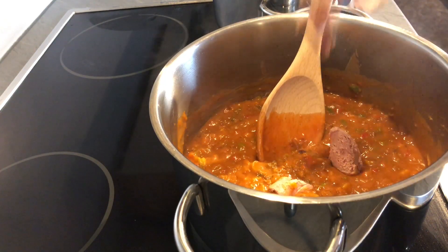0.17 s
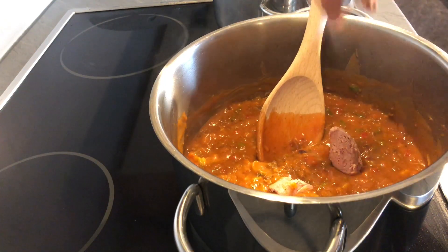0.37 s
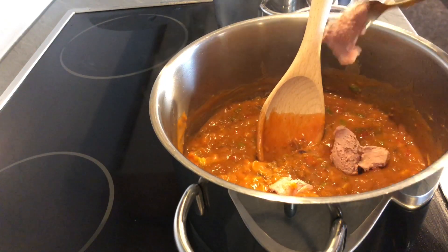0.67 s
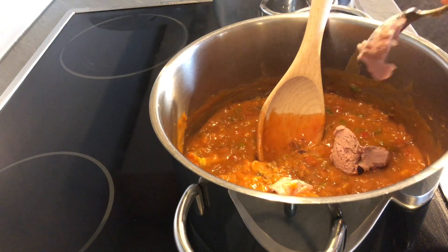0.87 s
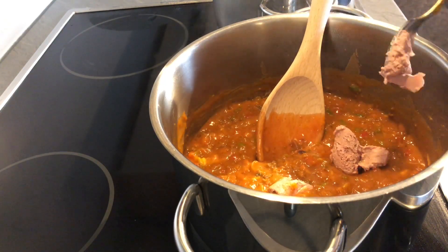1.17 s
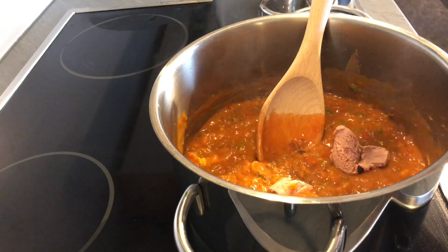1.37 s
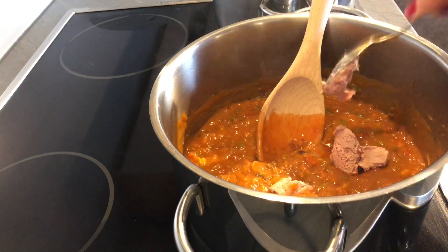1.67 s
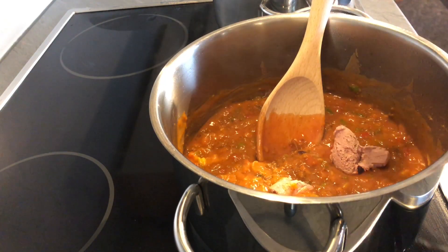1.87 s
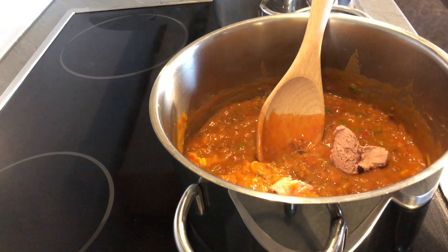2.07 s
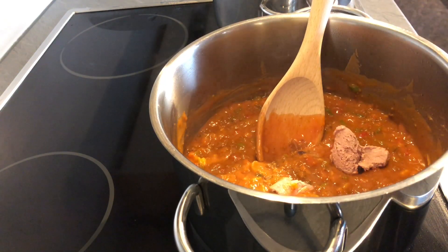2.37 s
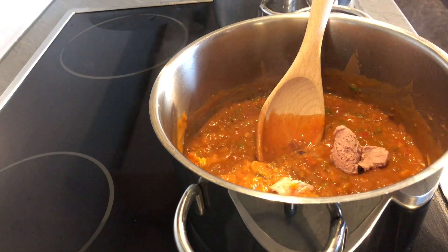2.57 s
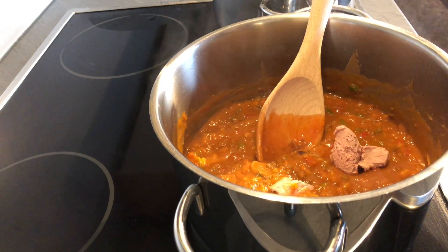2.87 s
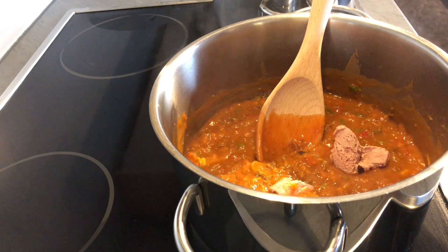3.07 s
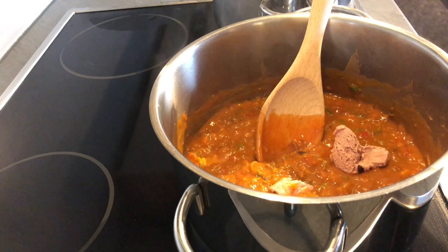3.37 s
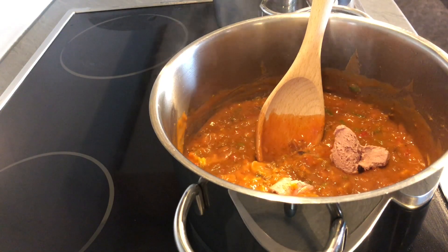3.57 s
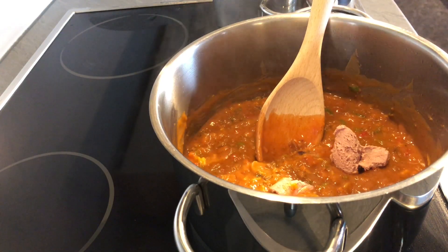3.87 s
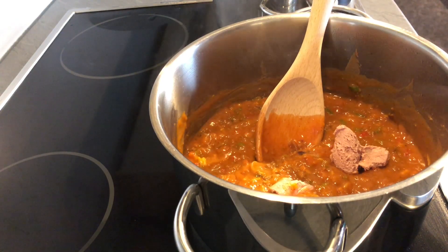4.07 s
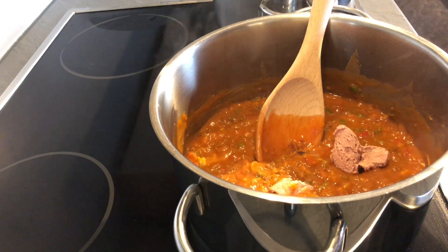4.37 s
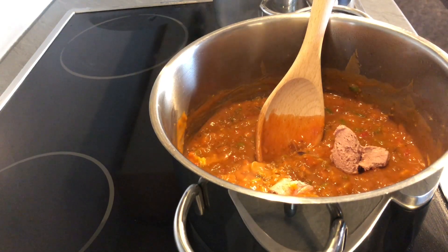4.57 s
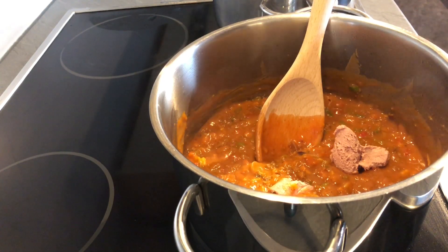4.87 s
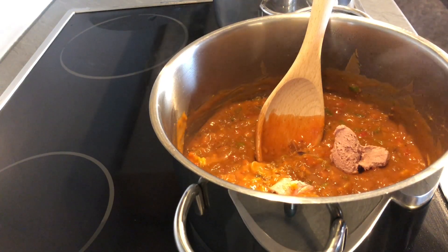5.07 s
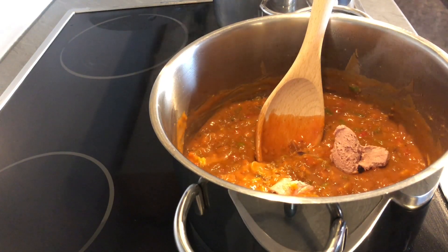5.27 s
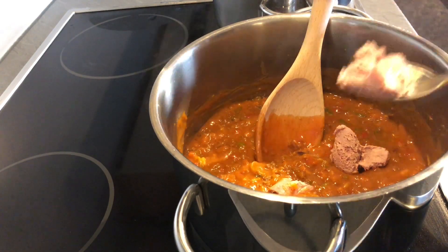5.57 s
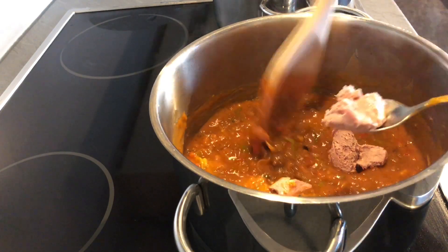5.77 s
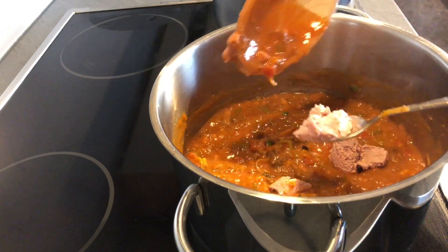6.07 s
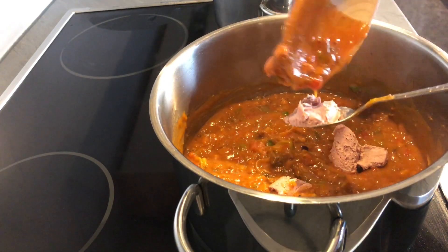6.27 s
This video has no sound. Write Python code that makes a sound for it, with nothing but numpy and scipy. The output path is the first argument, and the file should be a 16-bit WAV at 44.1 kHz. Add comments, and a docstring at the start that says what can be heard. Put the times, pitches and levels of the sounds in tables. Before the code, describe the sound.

In a kitchen, a wooden spoon knocks lightly on a pot, with faint wet smacks of sauce. A metal spoon clinks sharply against a dish several times. A cupboard door squeaks faintly, then slams with a harsh, distorted crack, and its contents rattle while a tray rings. A few soft knocks follow. The nearby microphone sounds slightly dull, with faint rumble and hiss fading in and out.

```python
"""Impacts and friction in a kitchen

Struck bodies ring in damped modes: a spoon clinks in a dish, wood knocks on counter and pot. Sauce smacks
and things slide. A cupboard door squeaks, slams and rattles, and a tray inside sings. Background rumble
and hiss rise and fall as the recorder's noise suppressor opens and closes. The loudest blow overflows
the number range and wraps round into a harsh crack."""
import sys
import numpy as np
from scipy import signal
from scipy.fft import rfft, irfft, next_fast_len
from scipy.io import wavfile
from scipy.ndimage import uniform_filter1d, minimum_filter1d, map_coordinates

SR = 44100
rng = np.random.default_rng(int(sys.argv[2]) if len(sys.argv) > 2 else 0)


def waveform_to_disk(signal):
    """Save audio, clipped to [-1, 1], as 16-bit WAV at the path in sys.argv[1]."""
    frames = np.transpose(np.atleast_2d(signal))
    scaled = np.clip(frames, -1, 1) * 32767
    samples = np.round(scaled).astype(np.int16)
    wavfile.write(sys.argv[1], SR, samples)


N = 283563

# background let through by the noise suppressor: t/s, rumble level/dB, hiss level/dB
SUPPRESSOR_LEVELS = [(0.0, -56, -61), (0.14, -51.5, -62), (0.27, -52, -59.5), (0.5, -71.5, -78),
                     (0.76, -67, -76), (0.87, -56, -61.5), (1.03, -55.5, -63.5), (1.2, -54.5, -63),
                     (1.49, -69, -77.5), (1.73, -68, -81.5), (1.9, -59.5, -66.5), (2.15, -52.5, -60.5),
                     (2.45, -65, -67), (2.66, -67.5, -77), (2.88, -59.5, -67.5), (3.14, -50.5, -57.5),
                     (3.3, -55.5, -58), (3.59, -65, -75), (3.74, -61.5, -65.5), (3.84, -56.5, -56.5),
                     (4.05, -49.5, -52), (4.46, -48, -57.5), (5.07, -52, -46.5), (5.18, -54, -52),
                     (5.36, -69.5, -77), (5.62, -75.5, -76.5), (5.78, -60, -70.5), (5.94, -64, -68),
                     (6.15, -53.5, -60.5), (6.29, -56, -67.5), (6.43, -71.5, -74)]
# spectra of the rumble and of the hiss before its tilt: f/Hz, relative density/dB
RUMBLE_SPECTRUM = [(12, -64.5), (20, -37), (43, -6.5), (173, -7), (206, -11), (242, -4.5), (289, -23.5),
                   (323, -16.5), (400, -33), (520, -57), (880, -120)]
HISS_SPECTRUM = [(180, -24), (300, -8.5), (523, -3), (1070, -8), (1200, -8), (1720, -12), (2840, -14),
                 (5490, -25), (7060, -32.5), (9180, -72), (15500, -120)]
# reverberation time of the kitchen: f/Hz, T60/s
REVERBERATION = [(150, 0.43), (1000, 0.12), (3000, 0.28), (7000, 0.39)]
# smacks of sauce: t/s, level/dB, centre f/Hz, duration/s
SAUCE_SMACKS = [(0.361, -68.5, 3400, 0.067), (0.546, -74, 3500, 0.013), (0.855, -63, 3340, 0.053),
                (0.925, -56, 2880, 0.0043), (1.166, -63.5, 3000, 0.02), (1.325, -68, 3000, 0.018),
                (1.34, -68, 3940, 0.066), (1.845, -72, 3500, 0.038), (2.261, -55.5, 1900, 0.035),
                (2.856, -66, 3980, 0.057), (4.041, -64, 4500, 0.022), (5.377, -72.5, 3004, 0.023),
                (5.589, -72, 5020, 0.0095), (5.652, -71, 2985, 0.03), (5.717, -72, 5450, 0.0097),
                (5.77, -69, 4090, 0.034), (5.848, -66.5, 3040, 0.04), (6.347, -72, 4000, .045)]
# sliding contacts: t/s, level/dB, rise/(dB/s), fall/(dB/s), hold/s, centre f/Hz
SLIDING_CONTACTS = [(3.125, -41, 898, 110, 0.0008, 2900), (3.636, -55, 305, 1200, 0.014, 2880),
                    (3.82, -50.5, 295, 110, 0.17, 2900), (4.96, -50, 500, 96, .13, 2154)]
# strokes of wood along the pot wall: t/s, level/dB, rise/(dB/s), fall/(dB/s), hold/s
POT_STROKES = [(5.952, -57.5, 900, 450, .13)]
# resonances of the pot wall: f/Hz, bandwidth/Hz, level/dB
POT_MODES = [(1468, 140, -12.5), (2230, 48, 3), (2553, 100, 0), (3854, 27, -9.5), (4170, 110, -6.5)]
# hinge squeaks at their loudest: t/s, level/dB, f/Hz, glide/(Hz/s), rise/(dB/s), fall/(dB/s)
HINGE_SQUEAKS = [(3.42, -58, 1200, 2.5, 108, 93.5), (3.885, -48.5, 1310, 2599, 700, 400),
                 (3.95, -47.5, 1745, 2302, 700, 200), (4.03, -57, 1840, -900, 150, 392),
                 (4.489, -47.5, 1584, 201.5, 130.5, 920), (3.665, -64.5, 2250, 2, 600, 250)]
# wooden knocks: t/s, level/dB, favoured f/Hz, upper-mode gain/dB, thud gain/dB
WOOD_KNOCKS = [(0.028, -37, 630, -7, -42.5), (0.152, -24, 577, -13.5, -32),
               (0.162, -24.5, 1260, 0.5, -27.5), (0.169, -17, 624, -17.5, -33.5),
               (0.185, -28, 622, -8, -27.5), (0.422, -47.5, 514, 1, -53), (0.494, -59, 1240, -7, -60),
               (0.846, -31.5, 1030, -7.5, -45), (0.919, -41.5, 516, -2, -62), (1.157, -35.5, 745, -13, -53),
               (1.259, -45.5, 650, -14, -42), (1.669, -53.5, 696, -9.5, -67), (1.957, -44, 1510, -6, -46),
               (1.972, -36.5, 1750, -4, -44.5), (2.863, -47.5, 1310, -3.5, -54),
               (2.921, -36, 590, -10.5, -37), (3.153, -26.5, 534, -14.5, -37),
               (3.208, -34.5, 1770, -13, -49.5), (3.294, -41, 605, -5, -55), (3.312, -38, 608, -10.5, -58),
               (3.427, -30.5, 1220, -26, -65), (3.438, -34, 1280, -16.5, -55.5),
               (3.494, -50, 1190, -27, -66.5), (3.555, -45.5, 1140, -10.5, -48.5),
               (4.059, -26.5, 620, -10.5, -52), (4.076, -31, 930, -22.5, -41.5),
               (4.109, -37.5, 500, -13, -49), (4.237, -30, 667, -10.5, -45.5), (4.245, -22, 605, -5.5, -46),
               (4.273, -34.5, 630, -7, -42), (4.287, -36, 713, -11.5, -47), (5.105, -31.5, 541, -10, -39.5),
               (5.155, -31, 897, -20, -46.5), (5.572, -48.5, 1277, -13.5, -59),
               (5.624, -62.5, 600, -5, -49), (5.736, -35.5, 600, -43, -47)]
# low modes of the counter: f/Hz, relative level/dB
COUNTER_MODES = [(62, -2), (130, -1.5), (248, -1.5)]
# spoon on the dish: t/s, level/dB, favoured f/Hz, lower-mode gain/dB, upper-mode gain/dB
SPOON_CLINKS = [(2.2873, -3, 2330, -19.5, -14), (2.339, -26, 2400, -23, -31),
                (2.38, -27, 2800, -22.5, -18.5), (2.485, -30.5, 2603, -40.5, -35),
                (2.515, -30, 2990, -25, -14), (2.564, -33, 3180, -22.5, -16), (2.595, -45.5, 3280, -1, -12),
                (3.096, -8.5, 3130, -7.5, -10.5), (3.256, -16, 3350, -4, -1.5),
                (3.2793, -31.5, 2330, -4, -29), (3.408, -44, 2240, 3, -11), (3.6416, -41, 2220, -7.5, -11),
                (6.085, -38.5, 3050, 5, -2.5)]
# modes of the struck bodies: f/Hz, relative level/dB, T60/s
WOOD_MODES = [(612, 1.5, 0.02), (900, -4.5, 0.0055), (1241, 1, 0.02), (1490, -2, .02), (1836, -3, .02),
              (2440, -12, 0.019), (3304, -3, 0.0079), (3940, -10, .015), (4190, -13.5, 0.025),
              (5430, -14, .01), (6700, -27, 0.014)]
DISH_MODES = [(981, -1.5, 0.0061), (1420, 1.5, 0.049), (1825, -1.5, 0.023), (2350, 0.5, 0.034),
              (2400, -4.5, 0.052), (2788, -13.5, 0.031), (2917, 4.5, 0.024), (3095, -6.5, 0.074),
              (3237, 10.5, 0.03), (3410, -17.5, 0.14), (3680, -5, 0.041), (4780, -9.5, 0.032),
              (4540, -3, 0.033), (5830, -5, 0.065), (5900, 0, 0.015), (6790, -12, 0.026)]
CUPBOARD_MODES = [(169.7, 2.5, 0.11), (258.8, -6, 0.12), (443.5, -5, 0.12), (526, 1, 0.045), (653, -1, .06),
                  (808, 4.5, 0.01), (938, 7, 0.036), (1050, -3.5, 0.021), (1236, 3, 0.028),
                  (1305, 3, 0.042), (1450, 6.5, 0.0084), (1830, -1, 0.054), (1904, 4.5, 0.022),
                  (2320, -7.5, .06), (2810, -17, 0.048), (3888, -38.5, 0.048), (4270, -25.5, 0.034),
                  (4840, -30.5, 0.024), (6040, -25.5, 0.041)]
# rattle of the loose contents: t/s, level/dB
RATTLE_ENVELOPE = [(4.47, -44.5), (4.494, -40.5), (4.499, -17.5), (4.655, -26.5), (4.76, -17.5),
                   (4.842, -29.5), (5.05, -51.5)]
# spectrum with which they drive the panels: f/Hz, relative density/dB
RATTLE_SPECTRUM = [(41, -48.5), (70, -27), (164, -4), (361, -11.5), (421, -0.5), (492, -17.5), (552, 0.5),
                   (1900, -4.5), (2130, -15), (2350, -4), (2540, -16.5), (5290, -28), (7060, -48.5),
                   (9180, -86), (15500, -120)]
# swells of the ringing tray: t/s, level/dB, rise/(dB/s), fall/(dB/s)
TRAY_SWELLS = [(4.501, -13.5, 3000, 500), (4.57, -28, 510, 900), (4.705, -32.5, 880, 260),
               (4.758, -16.5, 205, 240), (4.944, -37.5, 200, 260)]
# blows of the door: t/s, level/dB
DOOR_BLOWS = [(4.457, -30.5), (4.4958, -7.5), (4.4993, 5.5), (4.503, -5.5), (4.526, -1), (4.554, -2.5),
              (4.662, -0.5), (4.696, -3), (4.718, -1.5), (4.744, -11), (4.759, -6.5), (4.778, -8.5),
              (4.809, -18.5)]

MIC_LIMIT_HZ = 7150


def amp(db):
    """Amplitude ratio of a level in dB."""
    return 10 ** (np.asarray(db) / 20)


def unit_rms(x):
    """Normalisation to an rms of 1."""
    return x / np.sqrt(np.mean(x ** 2) + 1e-20)


def log_interp(points, hz):
    """Interpolation of (f/Hz, value) points on a logarithmic frequency axis."""
    f, values = np.transpose(points)
    return np.interp(np.log(hz + 1), np.log(f + 1), values)


def envelopes(rows):
    """A gate open over the table's time span, then each column interpolated linearly."""
    times, *columns = np.transpose(rows)
    t = np.arange(N) / SR
    gate = np.clip(np.minimum(t - times[0], times[-1] - t) / .012, 0, 1)
    return [gate] + [np.interp(t, times, column) for column in columns]


def swell(start, db, rise, fall, hold=0):
    """Exponential growth up to time start, a hold, then exponential decay; slopes in dB/s."""
    t = np.arange(N) / SR - start
    return amp(db + rise * np.minimum(t, 0) - fall * np.maximum(t - hold, 0))


def wobble(rate):
    """Smooth random modulation: a spline through rate knots a second."""
    knots = rng.standard_normal(int(N * rate / SR) + 4)
    return map_coordinates(knots, [np.arange(N) * rate / SR])


def filtered(x, response):
    """Linear filtering: the spectrum is multiplied by response(f)."""
    size = next_fast_len(len(x) + 8192)
    return irfft(rfft(x, size) * response(np.fft.rfftfreq(size, 1 / SR)), size)[:len(x)]


def gritty_noise(spectrum_db, grit_db):
    """Noise roughened by random amplitude modulation, then coloured by spectrum_db(f)."""
    noise = rng.standard_normal(N) * amp(grit_db * wobble(250))
    hz, _, frames = signal.stft(noise, SR, nperseg=1024, noverlap=768)
    gain = unit_rms(amp(spectrum_db(hz[:, None] + 1)))
    return unit_rms(signal.istft(frames * gain, SR, nperseg=1024, noverlap=768)[1][:N])


def unsteady_tone(hz, gain, flutter_db, rough):
    """A sinusoid under random amplitude and phase modulation."""
    phase = 2 * np.pi * np.cumsum(hz + np.zeros(N)) / SR + rough * wobble(120)
    return gain * amp(flutter_db * wobble(60)) * np.sqrt(2) * np.sin(phase)


def strike_point(hz, low_db, high_db, reach, fall):
    """The point struck weights the modes: 0 dB at hz, low_db and high_db a factor reach to each side."""
    points = [(hz / reach, low_db), (hz, 0), (hz * reach, high_db), (hz * 6, fall * high_db)]
    return lambda f: log_interp(points, f)


def impact(modes, weight_db, crack, cycles, rough):
    """Modal superposition: damped sinusoids of wandering phase and a crack of noise, scaled to peak 1."""
    t = np.arange(SR // 4) / SR
    hz, db, t60 = np.transpose(modes)[..., None]
    decay = amp(db + weight_db(hz) + 1.5 * rng.standard_normal(hz.shape) - 60 * t / t60)
    rise = 1 - np.exp(-(t * hz / cycles) ** 2)  # build-up time is counted in each mode's own cycles
    random_walk = np.cumsum(rng.standard_normal(decay.shape), axis=1)
    wander = rough * uniform_filter1d(random_walk, size=100, axis=1)
    ring = np.sum(decay * rise * np.sin(2 * np.pi * hz * t + wander), axis=0)
    spectrum = np.array(modes)[:, :2]
    colour = lambda f: amp(log_interp(spectrum, f) + weight_db(f + 1)) * (f > .8 * hz.min())
    burst = filtered(rng.standard_normal(len(t)), colour) * amp(-60 * t / 0.034) * rise[len(modes) // 3]
    blow = ring / np.abs(ring).max() + crack * burst / np.abs(burst).max()
    return blow / np.abs(blow).max()


def add_in_room(out, start, blow, room_db):
    """Reverberation: adds to out a blow and its diffuse tail, each frequency decaying at its own rate."""
    hz, t, frames = signal.stft(rng.standard_normal(SR // 2), SR, nperseg=256)
    decay = amp(-60 * t / log_interp(REVERBERATION, hz)[:, None])
    tail = signal.istft(frames * decay, SR, nperseg=256)[1]
    echo = signal.fftconvolve(blow, np.pad(tail / np.linalg.norm(tail), (300, 0)))
    sound = np.pad(blow, (0, len(echo) - len(blow))) + amp(room_db) * echo
    out[round(start * SR):][:len(sound)] += sound


def suppressed_background():
    """Time-varying gain: rumble and hiss rise and fall as the noise suppressor opens and closes."""
    _, rumble_db, hiss_db = envelopes(SUPPRESSOR_LEVELS)
    rumble = unit_rms(filtered(rng.standard_normal(N), lambda f: amp(log_interp(RUMBLE_SPECTRUM, f))))
    hiss = gritty_noise(lambda f: log_interp(HISS_SPECTRUM, f) + 1.2 * np.log2(f / 1500), grit_db=1.0)
    return amp(rumble_db + 3 * wobble(29)) * rumble + amp(hiss_db + 0.4 * wobble(25)) * hiss


def sauce_smacks():
    """Noise transients: each wet smack is a gritty puff of treble under a half-sine envelope."""
    out, t = np.zeros(N + SR), np.arange(SR // 10) / SR
    for start, db, hz, duration in SAUCE_SMACKS:
        grit = rng.standard_normal(len(t)) * amp(4.1 * np.repeat(rng.standard_normal(len(t) // 42), 42))
        puff = unit_rms(filtered(grit, lambda f: amp(-10.5 * np.log2((f + 1) / hz) ** 2)))
        out[round(start * SR):][:len(t)] += amp(db) * puff * np.sin(np.pi * np.clip(t / duration, 0, 1))
    return out[:N]


def slides():
    """Sliding friction: gritty noise around one broad resonance."""
    out = np.zeros(N)
    for *envelope, hz in SLIDING_CONTACTS:
        band_db = lambda f: -9.5 * np.log2(f / hz) ** 2 - 60 * (f > MIC_LIMIT_HZ)
        out += swell(*envelope) * gritty_noise(band_db, grit_db=2.5)
    return out


def pot_scrape():
    """Forced vibration: the friction of wood drives the resonances of the pot wall."""
    wall = lambda f: sum(amp(db) * width * f / np.abs(hz * hz - f * f + 1j * f * width)
                         for hz, width, db in POT_MODES)
    friction = rng.standard_normal(N) * amp(1.8 * wobble(200))
    return sum(swell(*row) for row in POT_STROKES) * unit_rms(filtered(friction, wall))


def hinge_squeaks():
    """Frequency modulation: each squeak glides linearly within 0.2 s of its loudest moment."""
    out, t = np.zeros(N), np.arange(N) / SR
    for peak_time, db, hz, glide, rise, fall in HINGE_SQUEAKS:
        pitch = hz + glide * np.clip(t - peak_time, -.2, .2)
        out += unsteady_tone(pitch, swell(peak_time, db, rise, fall), flutter_db=1.5, rough=0.51)
    return out


def wood_knocks():
    """Soft impact: the modes of the wood build up gradually, and the counter's low modes thud."""
    out, t = np.zeros(N + SR), np.arange(SR // 4) / SR
    for start, db, hz, high_db, thud_db in WOOD_KNOCKS:
        weight_db = strike_point(hz, low_db=-6.5, high_db=high_db, reach=1.4, fall=1.7)
        blow = amp(db) * impact(WOOD_MODES, weight_db, crack=0.43, cycles=1.9, rough=0.11)
        counter = sum(amp(mode_db + rng.normal(-3, 1)) * np.sin(2 * np.pi * f * rng.normal(1, 0.044) * t)
                      for f, mode_db in COUNTER_MODES)
        thud = amp(thud_db - 60 * t / 0.098) * counter * (1 - np.exp(-t / .004))
        add_in_room(out, start, blow + thud, room_db=-7)
    return out[:N]


def spoon_clinks():
    """Hard impact: steel excites the modes of the dish within about one cycle."""
    out = np.zeros(N + SR)
    for start, db, hz, low_db, high_db in SPOON_CLINKS:
        weight_db = strike_point(hz, low_db, high_db, reach=1.16, fall=1)
        blow = amp(db) * impact(DISH_MODES, weight_db, crack=0.86, cycles=0.93, rough=0.09)
        add_in_room(out, start, blow, room_db=-9.5)
    return out[:N]


def tray_ring():
    """Resonance: a single mode of the tray swells and decays repeatedly."""
    gain = sum(swell(*row) for row in TRAY_SWELLS)
    return unsteady_tone(hz=2281, gain=gain, flutter_db=2.0, rough=.15)


def contents_rattle():
    """Forced vibration: loose contents drive the cupboard's panel resonances, each 30 Hz wide."""
    gate, db = envelopes(RATTLE_ENVELOPE)
    shaking = gritty_noise(lambda f: log_interp(RATTLE_SPECTRUM, f), grit_db=2.5)
    panels = lambda f: 1 + 3.0 * sum(30 * f / np.abs(hz * hz - f * f + 30j * f)
                                     for hz, _, _ in CUPBOARD_MODES)
    return gate * amp(db) * unit_rms(filtered(shaking, panels))


def latch_snap(start=4.497, db=14, hz=1050, duration=.0034):
    """Impulsive excitation: the latch gives a dry tone burst a few cycles long."""
    out, t = np.zeros(N), np.arange(SR // 100) / SR
    tone = np.sin(2 * np.pi * hz * t + 0.1 * np.cumsum(rng.standard_normal(len(t))))
    envelope = np.clip(t * 4000, 0, 1) * np.clip(1 - t / duration, 0, 1) ** .5
    out[round(start * SR):][:len(t)] = amp(db) * tone * envelope
    return out


def door_slam():
    """Free vibration: each blow of the door leaves the cupboard ringing in its modes."""
    out = np.zeros(N + SR)
    weight_db = lambda f: -1.5 * (f < 350) + 1.0 * (f > 2600)
    for start, db in DOOR_BLOWS:
        blow = amp(db) * impact(CUPBOARD_MODES, weight_db, crack=0.68, cycles=0.41, rough=0.036)
        add_in_room(out, start, blow, room_db=-9)
    return out[:N]


def cupboard(cutoff_hz=85):
    """Radiation efficiency: the panels give off slam, snap and rattle without their deep bass."""
    vibration = door_slam() + latch_snap() + contents_rattle()
    return filtered(vibration, lambda f: f ** 4 / (f ** 4 + cutoff_hz ** 4))


def scene():
    """Superposition: the pressures of all sources add at one microphone."""
    return (suppressed_background() + wood_knocks() + spoon_clinks() + sauce_smacks() + cupboard()
            + tray_ring() + slides() + pot_scrape() + hinge_squeaks())[None]


def record(dry):
    """Overflow distortion: in a narrow-band path, peaks too great for the limiter wrap round."""
    ceiling, limiter_range_db = .86, 6
    passband = lambda f: np.clip((MIC_LIMIT_HZ - f) / 2000, 0, 1) * f ** 2 / (f ** 2 + 35 ** 2)
    mic = filtered(dry[0], passband)
    gain = np.clip(ceiling / (np.abs(mic) + 1e-9), amp(-limiter_range_db), 1)
    limited = mic * uniform_filter1d(minimum_filter1d(gain, size=200), size=200)
    wrapped = (limited + 1) % 2 - 1  # beyond full scale the wave re-enters from the opposite side
    smoothed = filtered(wrapped, lambda f: 1.12 / (1 + (f / 15000) ** 4))
    converter_noise = amp(-96.5) * rng.standard_normal(N)
    return filtered(np.clip(smoothed, -1, 1) + converter_noise, lambda f: f < 21500)[None]


dry = scene()
out = record(dry)
waveform_to_disk(out)
```